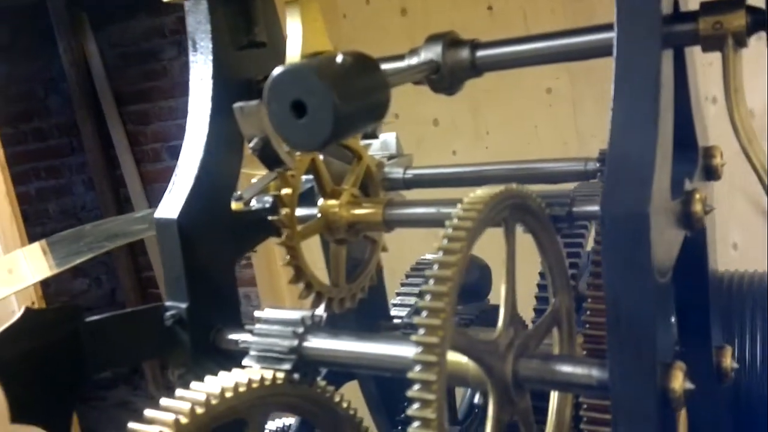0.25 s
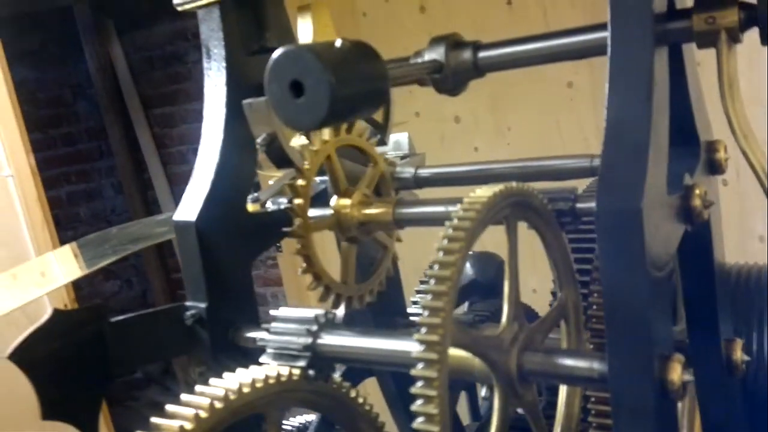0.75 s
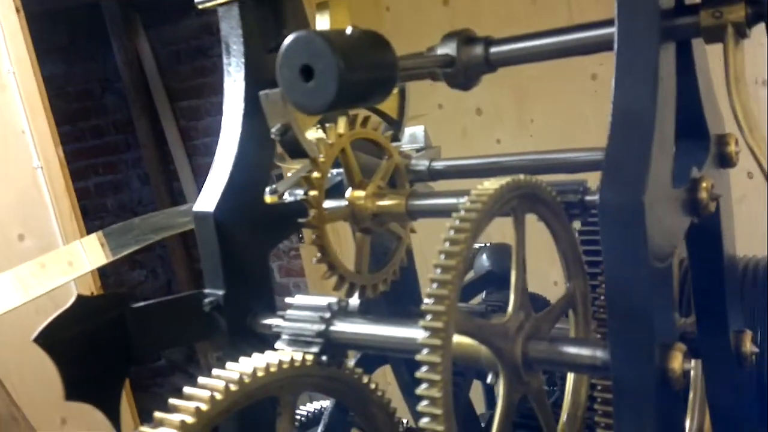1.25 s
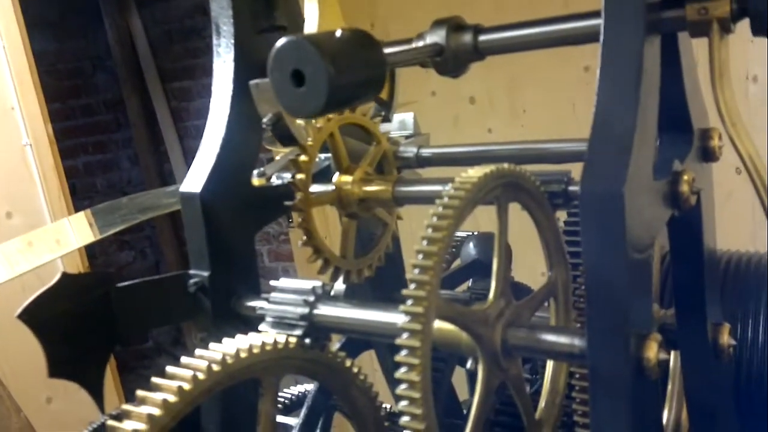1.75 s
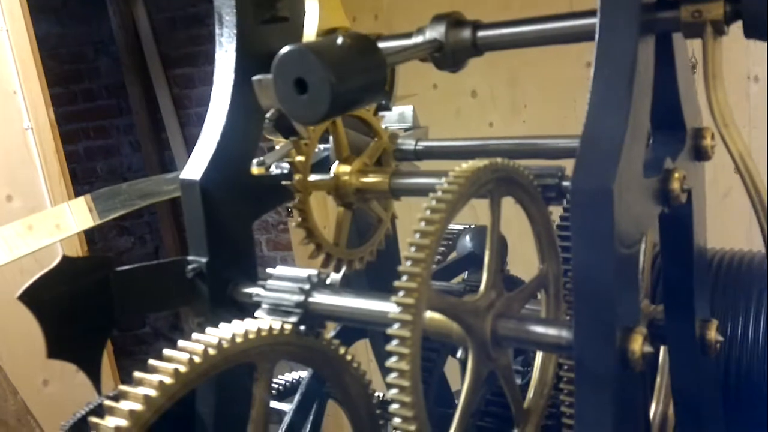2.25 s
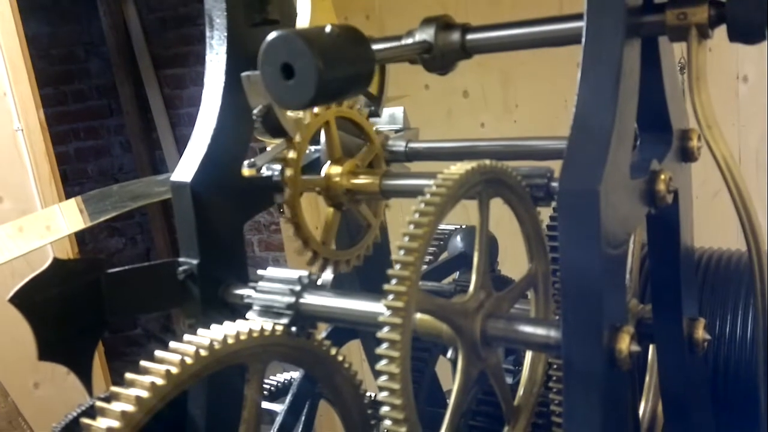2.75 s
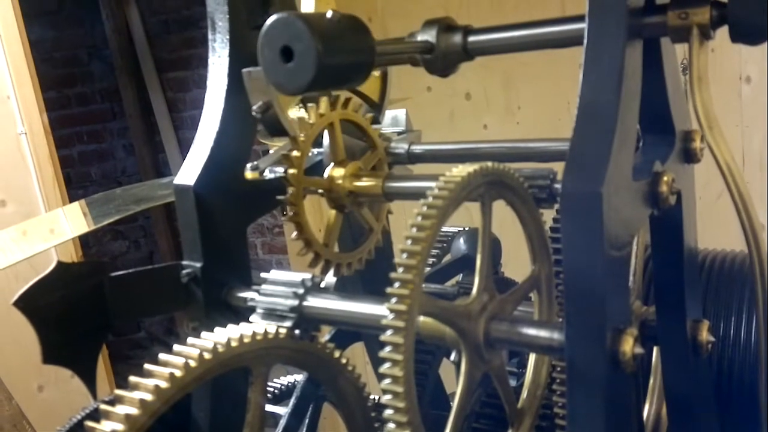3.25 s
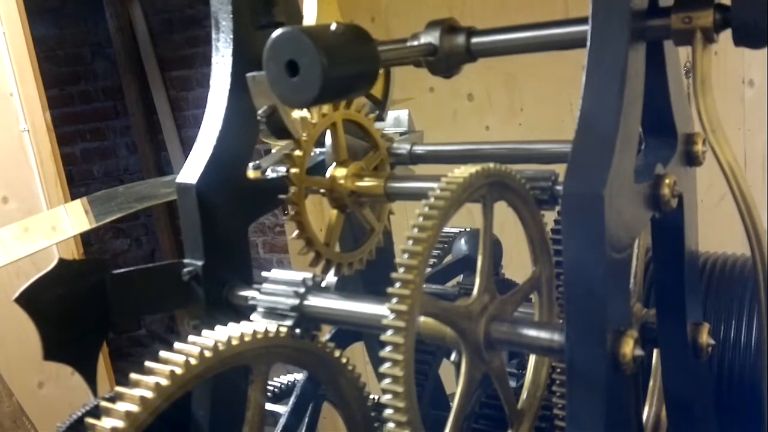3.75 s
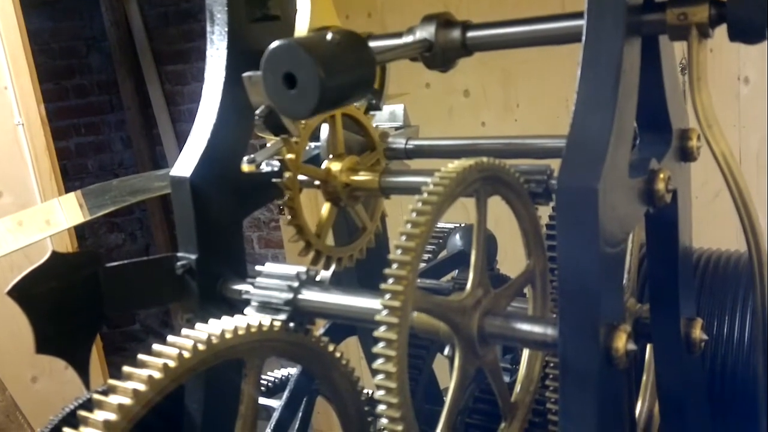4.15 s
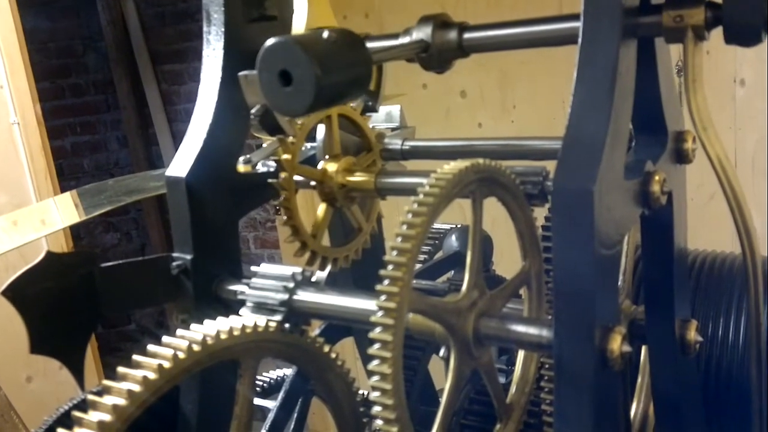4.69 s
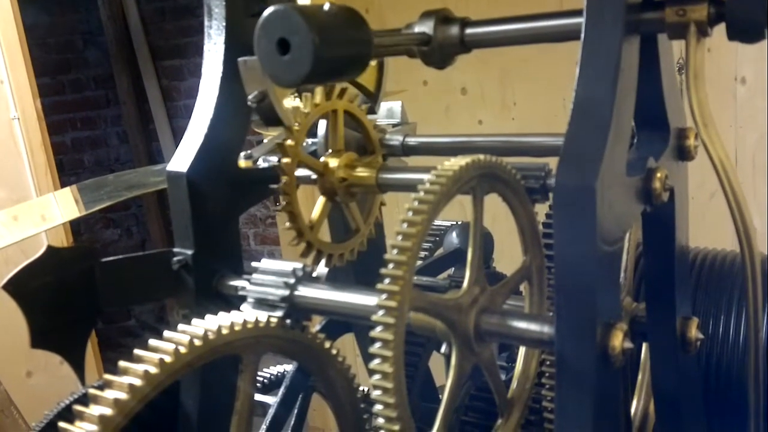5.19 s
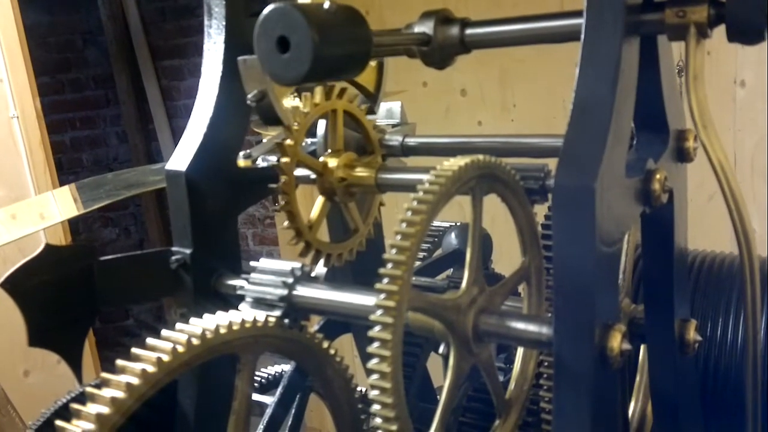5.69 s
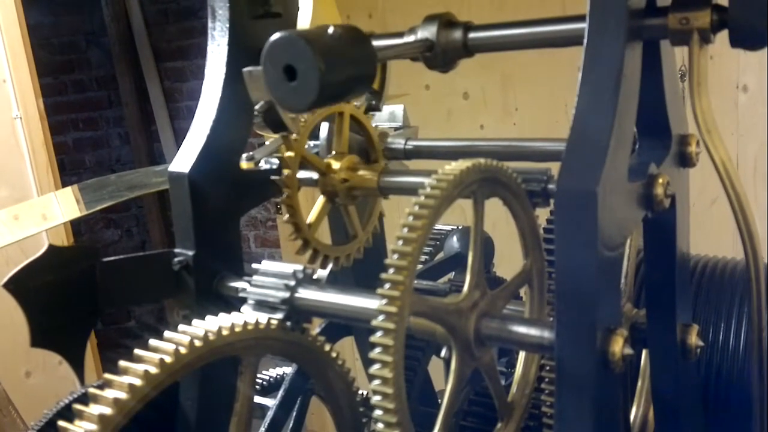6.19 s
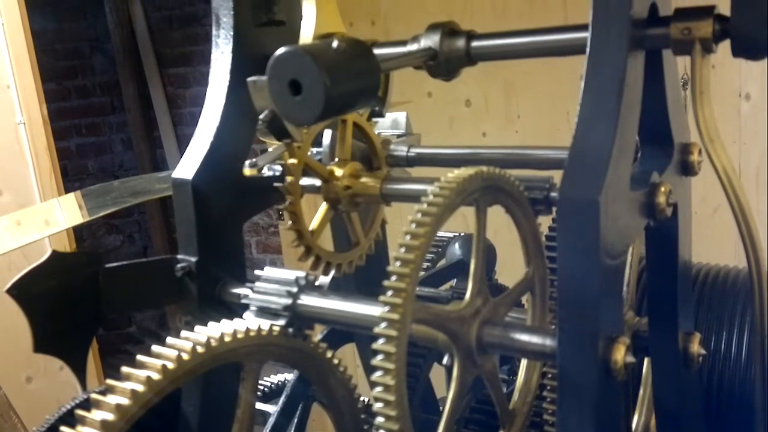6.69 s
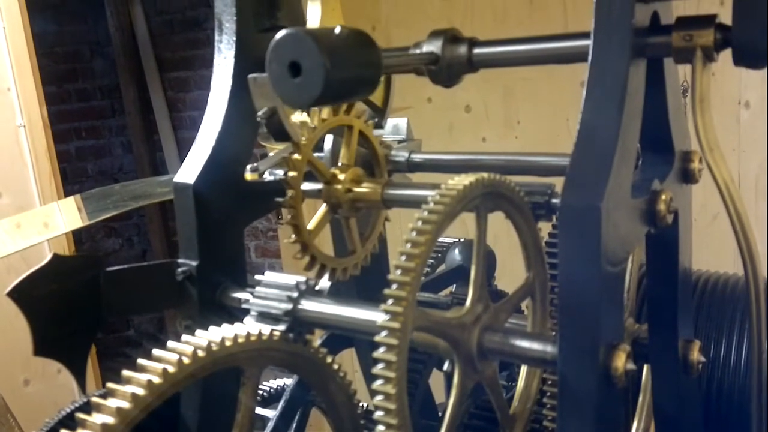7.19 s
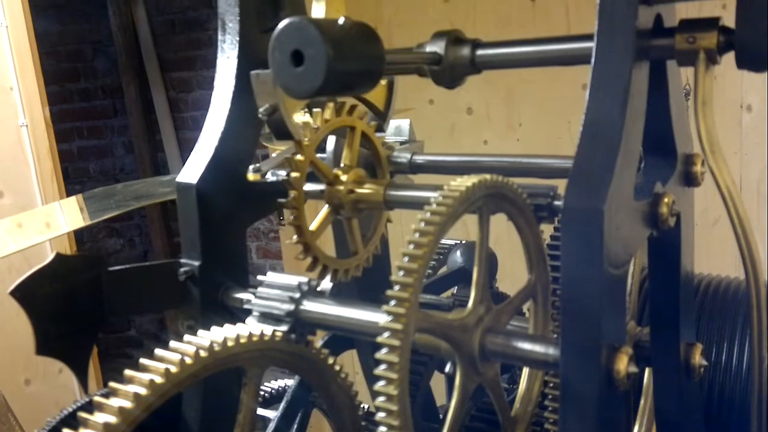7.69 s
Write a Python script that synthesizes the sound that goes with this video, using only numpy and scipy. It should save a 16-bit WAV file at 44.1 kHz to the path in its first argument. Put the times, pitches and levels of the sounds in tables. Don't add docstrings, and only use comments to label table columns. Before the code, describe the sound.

A large mechanical tower clock movement beats slowly and unevenly, heavy metallic clunks alternating with softer ticks over a faint low rumble in a quiet loft.

```python
import sys
import numpy as np
from scipy import signal
from scipy.fft import rfft, irfft
from scipy.io import wavfile
from scipy.ndimage import uniform_filter1d

SR = 44100
rng = np.random.default_rng(int(sys.argv[2]) if len(sys.argv) > 2 else 0)


def convert_level_to_amplitude(level_db):
    exponent = np.asarray(level_db, float) / 20
    return 10 ** exponent


def transcribe(signal):
    frames = np.atleast_2d(signal).T
    limited = np.clip(frames, -1, 1)
    pcm = np.round(limited * 32767).astype(np.int16)
    wavfile.write(sys.argv[1], SR, pcm)


N = 350137

# [t/s, level/dB]
HEAVY_BEATS = [(0.637, -25), (2.7795, -25.5), (4.9223, -25), (7.0665, -25.5)]
# [delay/s, strength/dB]
HEAVY_BLOWS = [
    (0, -21.5),
    (.011, -6.5),
    (0.0154, -4.5),
    (.021, 2.5),
    (.031, -12.5),
    (0.056, -11.5),
]
# [f/Hz, density/dB per Hz]
HEAVY_TOUCH = [(88, -42.5), (150, -15.5), (1200, -3), (2760, -17), (3350, -7.5), (3760, -18.5),
               (5990, -21.5), (6470, -22), (7130, -29), (10700, -19), (15500, -37)]
# [f/Hz, density/dB per Hz]
HEAVY_BODY = [(20, -6), (100, -9), (190, -16.5), (260, -5.5), (1000, -7), (1700, -11.5), (2500, -19.5),
              (3400, -18), (4400, -19), (4850, -28), (5800, -20.5), (8100, -33.5), (10900, -30.5),
              (15500, -52)]
# [f/Hz, level/dB]
HEAVY_FRAME = [(234, -5), (266, -5), (291, -2), (310, -6), (336, -1), (361, -6), (381, -4), (474, -7),
               (610, -2), (690, -8), (736, -4), (759, -3), (856, 0), (875, -3), (1040, 0), (1069, -8),
               (1085, -7), (1130, -7), (1248, -11), (1266, -9), (1444, -11), (1462, -12), (1569, -13),
               (1612, -10), (1650, -11), (1669, -9), (1697, -11), (1719, -12), (146, -10), (2020, -18)]
# [f/Hz, level/dB]
HEAVY_WHEELS = [(2943, -12), (3001, -14), (3171, -10), (3278, 0), (3417, -11), (3476, -12), (3600, -14),
                (3663, -12), (3786, -11), (3849, -13), (4013, -9), (4142, -12), (4264, -9), (4348, -7),
                (4557, -14), (5303, -14), (3324, 0)]
# [touch/dB, body/dB, frame/dB, wheels/dB, treble let go sooner/s]
HEAVY_MIX = (1.5, 3, 11.5, 1, 0)


def heavy_pallet():
    return pallet(HEAVY_BEATS, HEAVY_BLOWS, HEAVY_TOUCH, HEAVY_BODY, HEAVY_FRAME, HEAVY_WHEELS, HEAVY_MIX)


# [t/s, level/dB]
LIGHT_BEATS = [(1.8919, -36), (4.0333, -35.5), (6.1764, -35.5)]
# [delay/s, strength/dB]
LIGHT_BLOWS = [
    (0, -16.5),
    (0.0151, 3),
    (.020, -9.5),
    (.032, 0.5),
    (.070, -10),
]
# [f/Hz, density/dB per Hz]
LIGHT_TOUCH = [(88, -33), (150, -16), (595, -4.5), (1450, -7.5), (3980, -20), (4750, -24), (5440, -24),
               (6600, -27), (9540, -25), (10700, -24.5), (13000, -32), (15500, -62)]
# [f/Hz, density/dB per Hz]
LIGHT_BODY = [(20, -8), (100, -18.5), (190, -11), (300, 0), (1000, -6), (1700, -9), (2500, -17.5),
              (3400, -13.5), (4200, -19), (4850, -23), (5450, -19), (6600, -37), (10900, -37.5),
              (15500, -81)]
# [f/Hz, level/dB]
LIGHT_FRAME = [(311, -5), (380, 0), (436, -4), (486, -5), (502, -6), (563, -4), (583, -3), (615, -7),
               (649, -4), (666, -3), (685, -3), (704, -5), (735, -2), (812, -9), (855, -2), (876, -1),
               (900, -9), (1039, -3), (1083, -5), (1100, -10), (1222, -10), (1439, -11), (1462, -10),
               (1494, -10), (1550, -12), (1572, -9), (1591, -6), (1610, -7), (150, -12), (236, -6)]
# [f/Hz, level/dB]
LIGHT_WHEELS = [(2619, -8), (2845, -5), (2972, -7), (3063, -8), (3179, -7), (3278, -4), (3332, -3),
                (3565, -5), (3649, -9), (3727, -9), (3849, -9), (4012, 0), (4083, -9), (4210, -13),
                (4351, -10), (5342, -13)]
# [touch/dB, body/dB, frame/dB, wheels/dB, treble let go sooner/s]
LIGHT_MIX = (5.5, 5.5, 15.5, 2.5, 0.04)


def light_pallet():
    return pallet(LIGHT_BEATS, LIGHT_BLOWS, LIGHT_TOUCH, LIGHT_BODY, LIGHT_FRAME, LIGHT_WHEELS, LIGHT_MIX)


TOUCH_RISE_S, BRIGHT_HZ = 0.0017, 6500
DULLING_DB_PER_S, SHARP_FOR_S = 300, 0.014
BLOW_JITTER_S, BLOW_JITTER_DB = 0.00008, 1.3


def pallet(beats, blows, touch_colour, body_colour, frame, wheels, levels, play=0.48):
    touch_db, body_db, frame_db, wheels_db, sooner_s = levels
    touch = dense(touch_colour, 5.2, 0.52)
    touch = touch + 0.3 * dense(touch_colour, 0.86, 1.4)
    touch = touch * (1 - np.exp(-np.arange(touch.shape[1]) / SR / TOUCH_RISE_S))
    body = dense(body_colour, 0.94, 0.7)
    body = body + 1.4 * dense(body_colour, 4.4, 0.41)
    rings = convert_level_to_amplitude(frame_db) * ring(frame, blows, 0.55, 0.8)
    rings = rings + convert_level_to_amplitude(wheels_db) * ring(wheels, blows, 0.75, 0.8)
    treble = signal.butter(2, BRIGHT_HZ, "high", fs=SR, output="sos")
    out = np.zeros((2, N))
    for s, db in beats:
        loose_ring = 0.3 * convert_level_to_amplitude(frame_db) * ring(frame, blows, 0.91, 3.22)
        beat = convert_level_to_amplitude(touch_db) * touch + rings + loose_ring
        struck = convert_level_to_amplitude(body_db) * (body + play * dense(body_colour, 0.75, 1.9))
        bright = signal.sosfilt(treble, struck)
        wobble = rng.standard_normal((len(blows), 2))
        for (delay_s, blow_db), (late, hard) in zip(blows, wobble):
            dulled = 1 - convert_level_to_amplitude(-DULLING_DB_PER_S * max(delay_s - SHARP_FOR_S, 0))
            blow = convert_level_to_amplitude(blow_db + BLOW_JITTER_DB * hard) * (struck - dulled * bright)
            add(beat, delay_s + BLOW_JITTER_S * late, blow)
        add(out, s, convert_level_to_amplitude(db) * suppressed(beat, sooner_s))
    return out


# [f/Hz, t60/s, rise/s]
LOFT = [(30, 0.28, 0.029), (150, 0.34, 0.01), (302, 0.36, 0.011), (607.6, 0.4, 0.0044),
        (1000, 0.39, 0.0017), (2113, 0.32, 0.005), (2970, 0.22, 0.0009), (4900, 0.38, 0.00045),
        (7980, 0.12, .0005), (15000, 0.15, .0005)]
# [f/Hz, left minus right/dB]
BEAT_PAN = [(60, -5.5), (200, -6), (700, -5.5), (1700, -4), (3000, -9), (4300, -6.5), (5600, 0),
            (9000, -.5), (14000, 3)]
# [f/Hz, correlation/1]
BEAT_SAME = [(60, 0.66), (120, 0.83), (240, 0.96), (480, 0.94), (950, 0.8), (1600, 0.05), (3770, 0.02),
             (7520, 0.04), (15000, 0.04)]


def dense(colour, damping, rise_factor):
    size = 2 ** 14
    hz, t = np.fft.rfftfreq(size, 1 / SR), np.arange(size) / SR
    z = pair(hz.shape, hz, BEAT_SAME, BEAT_PAN) * convert_level_to_amplitude(read(colour, hz))
    out = np.zeros((2, size))
    for centre_hz in 2 ** np.arange(4.5, 14.6, 0.5):
        share = np.clip(1 - 2 * abs(np.log2(hz / centre_hz + 1e-9)), 0, 1)
        age = lagged(t, centre_hz)
        rise = 1 - np.exp(-age / (rise_factor * read(LOFT, centre_hz, column=2)))
        fall = convert_level_to_amplitude(-60 * damping * age / read(LOFT, centre_hz))
        out += irfft(z * share) * rise * fall
    return out / np.sqrt(np.mean(out[:, :2000] ** 2))


def ring(modes, blows, slowness, scatter):
    hz, db = np.transpose(modes)[:, :, None]
    t60, t = slowness * read(LOFT, hz), np.arange(2 ** 14) / SR
    rise_s = 0.32 * read(LOFT, hz, column=2)
    hardest_s = max(blows, key=lambda blow: blow[1])[0]
    sign, slip, spread = rng.standard_normal((len(modes), 3)).T[:, :, None]
    phase = 2 * np.pi * hz * (t - hardest_s) + np.pi * (sign > 0) + scatter * slip
    spread = spread * np.arccos(np.clip(read(BEAT_SAME, hz), -1, 1))
    energy = 0
    for delay_s, blow_db in blows:
        age = lagged(t - delay_s, hz)
        swell = convert_level_to_amplitude(blow_db - 60 * age / t60) * (1 - np.exp(-age / rise_s))
        energy = energy + swell ** 2
    swing, lean = convert_level_to_amplitude(db) * np.sqrt(energy / t60), convert_level_to_amplitude(read(BEAT_PAN, hz) / 2)
    sides = [swing * lean ** side * np.sin(phase + side * spread / 2) for side in (1, -1)]
    out = np.array([side.sum(0) for side in sides])
    return out / np.sqrt(np.mean(out[:, :3000] ** 2))


FLOOR_LAG_S, FLOOR_HZ = 0.016, 175


def lagged(t, hz):
    return np.maximum(t - FLOOR_LAG_S / (1 + (hz / FLOOR_HZ) ** 6), 0)


# [f/Hz, cut/dB]
TAIL_CUT = [(100, -4), (380, 11.5), (1000, 2.5), (2100, 29), (2600, 21), (4500, 28.5), (6800, 16),
            (10000, 5)]
SPLIT_HZ, STEP_S = 2400, 0.011
BASS_HOLD_S, BASS_WARNING_S, BASS_FIRST_SHARE = 0.2, 0.048, 0.15
TREBLE_HOLD_S, TREBLE_WARNING_S, TREBLE_FIRST_SHARE = 0.12, 0.028, 0.48
SOONER_S_PER_OCTAVE = 0.015


def suppressed(beat, sooner_s):
    hz, t = np.fft.rfftfreq(2 ** 15, 1 / SR), np.arange(beat.shape[1]) / SR
    z, out = rfft(beat, 2 ** 15), 0
    for k, (band_hz, cut_db) in enumerate(TAIL_CUT):
        if band_hz < SPLIT_HZ:
            hold, warning, first = BASS_HOLD_S, BASS_WARNING_S, BASS_FIRST_SHARE
        else:
            hold = TREBLE_HOLD_S - SOONER_S_PER_OCTAVE * np.log2(band_hz / SPLIT_HZ) - sooner_s
            warning, first = TREBLE_WARNING_S, TREBLE_FIRST_SHARE
        share = read([(row[0], j == k) for j, row in enumerate(TAIL_CUT)], hz)
        early = first * (1 + np.tanh((t - hold + warning) / STEP_S))
        late = (1 - first) * (1 + np.tanh((t - hold) / STEP_S))
        out = out + irfft(z * share)[:, :len(t)] * convert_level_to_amplitude(-cut_db * (early + late) / 2)
    return out


# [t/s, level/dB, fall/s, centre f/Hz, width/octaves]
SCUFFS = [(.93, -81, .02, 9000, 1.05), (1.03, -61, .013, 890, .48), (2.39, -56, 0.029, 750, .9),
          (2.395, -65, 0.021, 3400, 0.99), (3.04, -69, 0.02, 3200, .95), (3.042, -54, 0.047, 497, 0.9),
          (3.11, -57.5, 0.013, 824, 0.52), (4.331, -69, 0.017, 9000, 1.2), (4.3, -59, 0.018, 1000, 0.24),
          (5.299, -78, .047, 2900, .34), (7.748, -62, 0.029, 890, 0.45)]
SCUFF_RISE = 0.7


def scuffs():
    out, hz = np.zeros((2, N)), np.fft.rfftfreq(8192, 1 / SR)
    t = (np.arange(8192) - 4096) / SR
    for s, db, fall_s, centre_hz, octaves in SCUFFS:
        colour = convert_level_to_amplitude(-6 * (np.log2(hz / centre_hz + 1e-9) / octaves) ** 2)
        noise = evened(irfft(pair(hz.shape, hz, HUM_SAME, HUM_PAN) * colour))
        swell = np.exp(-abs(t) / np.where(t < 0, SCUFF_RISE * fall_s, fall_s))
        add(out, s + t[0], convert_level_to_amplitude(db) * noise * swell)
    return out


# [t/s, nearness/dB]
TRAFFIC = [(0, 0), (.6, 0), (2.4, 0.5), (3, 5.5), (3.4, 4), (3.9, 1.5), (4.5, 3.5), (5.2, 3.5), (5.8, 1),
           (6.5, 2), (7.2, 3.5), (7.94, 0.5)]
# [f/Hz, density/dB per Hz]
HUM = [(9, -30.5), (15, -4.5), (32, -2), (54, -8), (81, -3), (134, -7.5), (170, -12), (300, -14),
       (575, -20.5), (972, -17), (1400, -28), (2200, -31), (4000, -37.5), (16000, -45)]
# [f/Hz, left minus right/dB]
HUM_PAN = [(60, 3), (180, 0), (550, 0.5), (1650, -3.5), (4970, 0), (15000, -1.0)]
# [f/Hz, correlation/1]
HUM_SAME = [(60, 0.86), (150, 0.93), (380, 0.66), (950, 0.76), (2380, -0.06), (5980, -0.15), (15000, 0.095)]
HUM_DB, TYRES_DB = -59.5, 0.86
HUM_FOLLOWS, RUMBLE_FOLLOWS, TYRES_FOLLOW = -0.15, 0.9, 0.96


def traffic():
    frames, hz = N // 512 + 5, np.fft.rfftfreq(2048, 1 / SR)
    near_db = np.interp(np.arange(frames) * 512 / SR, *np.transpose(TRAFFIC))[:, None]
    lumps = uniform_filter1d(rng.standard_normal((frames, len(hz))), 12, 0)
    lumps = evened(uniform_filter1d(lumps, 10, 1))
    rumble = 1 / (1 + (hz / 160) ** 4)
    tyres = np.exp(-np.log2(hz / 800 + 1e-9) ** 2 / 1.3)
    colour = convert_level_to_amplitude(read(HUM, hz))
    z = pair((frames, len(hz)), hz, HUM_SAME, HUM_PAN) * colour / np.linalg.norm(colour)
    swell_db = near_db * (HUM_FOLLOWS + rumble * RUMBLE_FOLLOWS + tyres * TYRES_FOLLOW)
    lumps_db = (0.52 + 1.7 * rumble + 0.72 * tyres) * lumps
    z *= convert_level_to_amplitude(HUM_DB + TYRES_DB * tyres + swell_db + lumps_db)
    return signal.istft(z.swapaxes(1, 2), nperseg=2048, noverlap=1536)[1][:, :N]


def pair(shape, hz, same, pan):
    a, b, c, d = np.moveaxis(rng.standard_normal(shape + (4,)), -1, 0)
    shared, own = a + 1j * b, c + 1j * d
    like, lean = np.clip(read(same, hz), -1, 1), convert_level_to_amplitude(read(pan, hz) / 2)
    return np.array([shared * lean, (like * shared + np.sqrt(1 - like ** 2) * own) / lean])


def evened(x):
    return x / np.sqrt(np.mean(x ** 2) + 1e-20)


def read(points, hz, column=1):
    table = np.transpose(points)
    return np.interp(np.log(hz + 1), np.log(table[0] + 1), table[column])


def add(mix, s, sound):
    part = mix[:, round(s * SR):][:, :sound.shape[1]]
    part += sound[:, :part.shape[1]]


def scene():
    return convert_level_to_amplitude(-11.5) * (heavy_pallet() + light_pallet()) + traffic() + scuffs()


def top_cut(x):
    return signal.sosfilt(signal.butter(12, 16450, fs=SR, output="sos"), x)


def record(dry):
    lowpass = signal.firwin(127, 15850, fs=SR)[None]
    limited = signal.oaconvolve(dry, lowpass, "same")
    return top_cut(limited)


dry = scene()
out = record(dry)
transcribe(out)
```